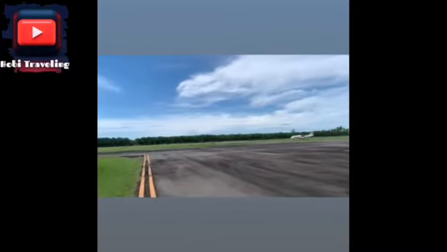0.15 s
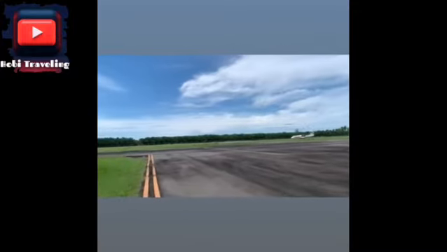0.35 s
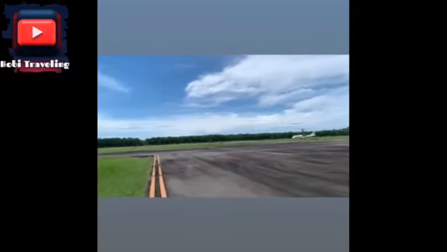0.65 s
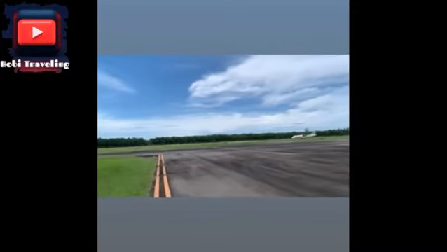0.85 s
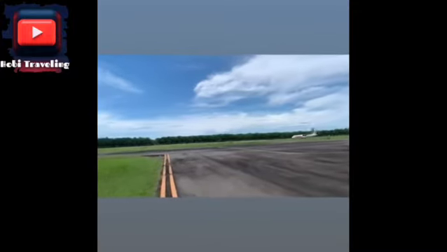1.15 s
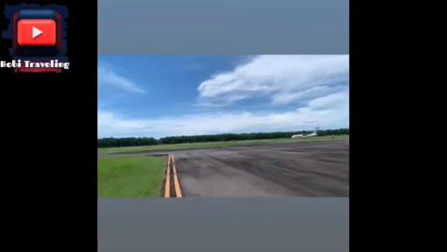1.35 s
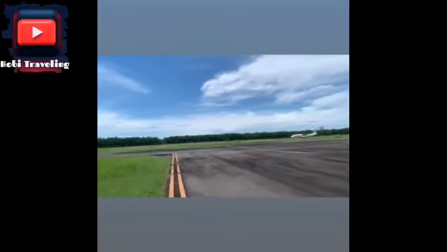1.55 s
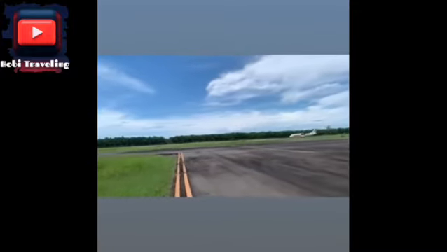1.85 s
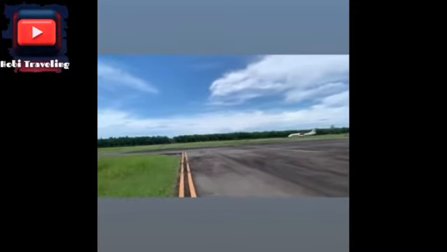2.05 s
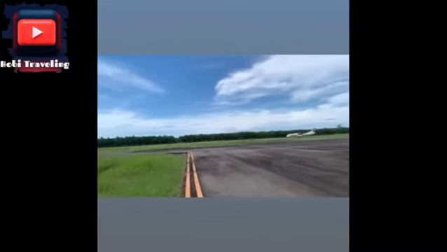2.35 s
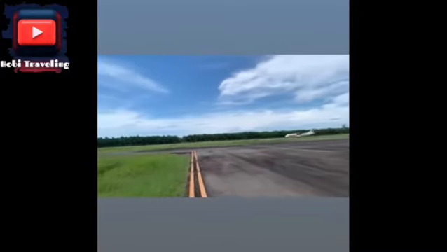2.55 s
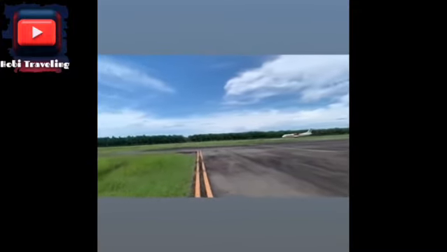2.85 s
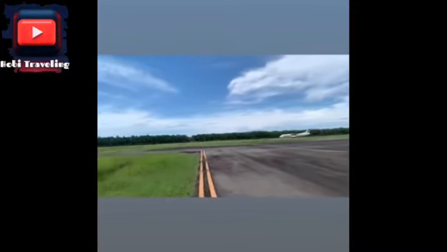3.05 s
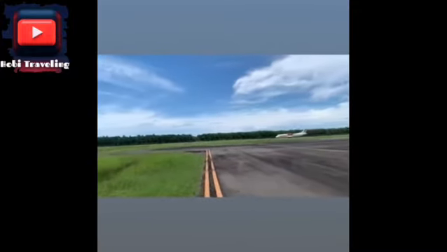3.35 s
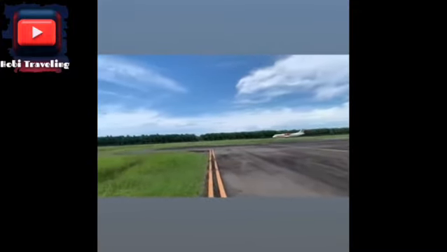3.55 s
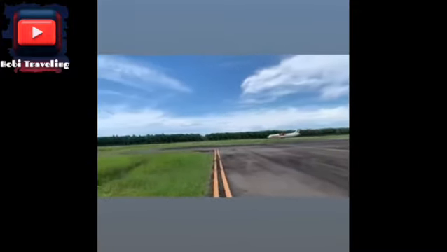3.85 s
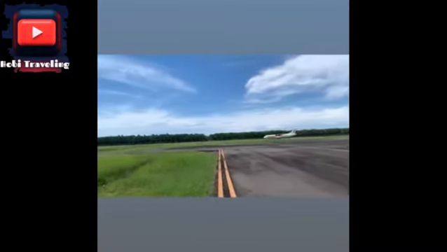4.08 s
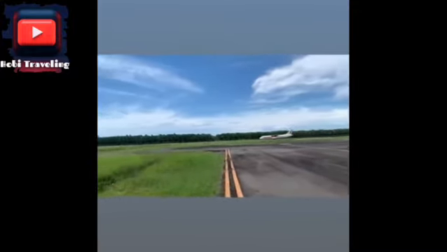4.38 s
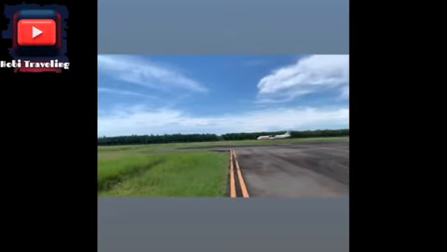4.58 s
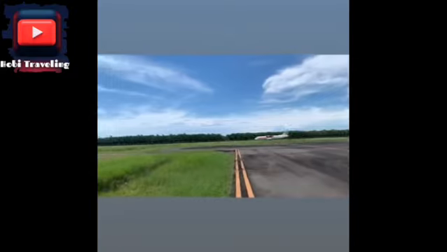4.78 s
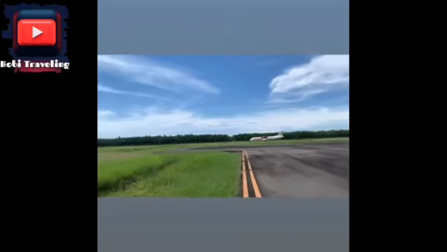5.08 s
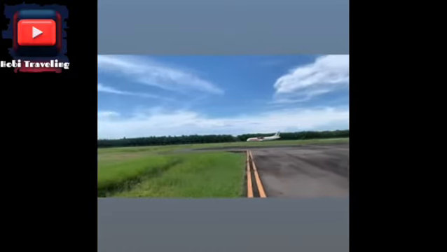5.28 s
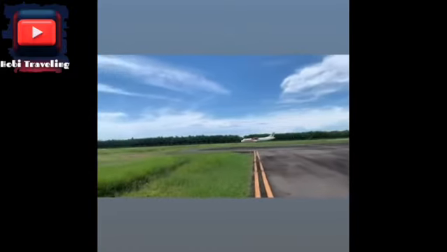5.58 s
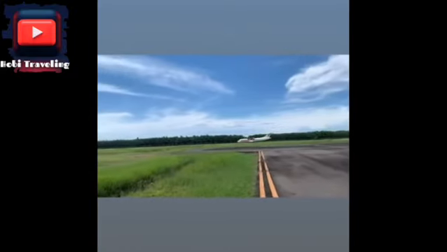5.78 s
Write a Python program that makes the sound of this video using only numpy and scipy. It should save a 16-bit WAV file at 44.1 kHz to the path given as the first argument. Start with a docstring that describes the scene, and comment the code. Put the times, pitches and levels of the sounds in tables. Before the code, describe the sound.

A twin-engine turboprop plane rolls along a distant runway on an open airfield. Its low propeller hum swells and dips slowly over an exhaust rumble and a rush of air. From about halfway the drone grows louder and fuller, sinking slightly in pitch, while high turbine hiss arrives in gusts. Near the end a light wind thumps faintly on the hand-held stereo microphone.

```python
"""The propellers of a twin turboprop hum at the blade-passing rate, beating slowly, as it rolls nearer
along a distant runway. Under them the exhaust rumbles; the propeller wash and slipstream roar, and
turbine hiss arrives in gusts through turbulent air, chopped by the passing blades.
A light wind thumps on the ports of a hand-held stereo microphone."""
import sys
import numpy as np
from scipy import signal
from scipy.fft import rfft, irfft, next_fast_len
from scipy.io import wavfile
from scipy.ndimage import map_coordinates

SR = 44100
rng = np.random.default_rng(int(sys.argv[2]) if len(sys.argv) > 2 else 0)


def int16_out(signal):
    """Quantize to a 16-bit WAV file."""
    q = np.round(np.clip(np.atleast_2d(signal).T, -1, 1) * 32767)
    wavfile.write(sys.argv[1], SR, q.astype(np.int16))


N = 261072

# turbine hiss, carried in gusts that also sway the slipstream: t/s, level/dB
GUSTS = [(0, -48.5), (.3, -51), (.88, -42), (1.12, -49), (1.4, -43), (1.58, -44), (1.66, -49),
         (1.85, -46.5), (2.08, -42.5), (2.25, -36), (2.4, -36.5), (2.5, -33.5), (2.65, -45), (2.95, -40.5),
         (3.05, -37), (3.11, -33), (3.18, -35.5), (3.26, -40), (3.4, -44), (3.53, -40.5), (3.72, -41.5),
         (3.87, -43), (4.14, -35), (4.19, -31), (4.33, -31), (4.42, -37), (4.56, -36), (4.71, -35),
         (4.83, -38), (5.13, -41), (5.21, -40.5), (5.27, -33), (5.31, -34), (5.38, -36.5), (5.44, -33.5),
         (5.51, -33.5), (5.6, -36.5), (5.7, -37), (5.81, -37), (5.86, -37.5), (5.92, -40)]


def propellers(blade_phase):
    """Superposition: blade harmonics add up to pulses; the air path makes each waver, less when near."""
    # fundamental, swelling and dipping as the two propellers beat: t/s, level/dB
    hum = [(0.0, -44), (0.18, -35), (0.46, -40.5), (0.63, -30.5), (1.09, -35.5), (1.17, -30), (1.35, -45),
           (1.43, -31), (1.76, -35.5), (1.83, -46.5), (2.01, -30.5), (2.29, -35.5), (2.32, -48),
           (2.39, -29.5), (2.6, -30.5), (2.77, -37), (2.83, -28.5), (3.08, -32.5), (3.12, -25), (3.31, -32),
           (3.38, -26), (3.79, -24.5), (3.89, -25.5), (4.29, -19.5), (4.42, -21), (4.47, -18.5),
           (4.71, -23), (4.81, -19.5), (5.08, -27.5), (5.13, -22), (5.23, -25.5), (5.46, -20),
           (5.56, -28.5), (5.8, -28), (5.85, -23), (5.92, -28)]
    # second harmonic, emerging on the approach: t/s, level/dB
    overtone = [(2.9, -52.5), (3.1, -45), (3.2, -41), (3.37, -31.5), (3.45, -41), (3.52, -38),
                (3.63, -37.5), (3.8, -28.5), (4, -34), (4.2, -42.5), (4.38, -28.5), (4.55, -38),
                (4.71, -38.5), (4.8, -29), (5.08, -29.5), (5.47, -36), (5.55, -52), (5.77, -42.5),
                (5.83, -36), (5.92, -30.5)]
    t = np.arange(N) / SR
    emerged = np.clip((t - overtone[0][0]) / .27 + 1, 0, 1)
    unrest = 1 - .85 * np.clip(t - 2.4, 0, 1)
    third_db = -55.5 + 4 * drift(2.25) - 4 * np.maximum(t - 4.4, 0)  # fades as the aircraft turns
    levels = [from_db(in_time(hum)[0]), emerged * from_db(in_time(overtone)[0]),
              emerged * from_db(third_db)]
    tone = 0
    for harmonic, level, waver_db in zip((1, 2, 3), levels, (2.2, 1.1, 1.2)):
        amplitude = np.sqrt(2) * level * from_db(waver_db * unrest * drift(18))
        tone += amplitude * np.cos(harmonic * blade_phase + .35 * unrest * drift(7))
    return tone


def exhaust_and_wash():
    """Turbulent mixing: exhaust and propeller wash radiate bands of noise that grow on the approach."""
    # t/s, then level/dB of deep rumble, exhaust growl, exhaust drone and wash
    approach = [(0, -40, -41, -51.5, -45), (.75, -43, -40, -55, -50.5), (1.2, -43, -39.5, -52, -45.5),
                (1.6, -42, -38, -51, -44.5), (1.9, -39, -37.5, -49, -42.5), (2.5, -41.5, -34.5, -47, -44.5),
                (3, -38.5, -33, -44, -42.5), (3.5, -38.5, -31, -42, -45.5), (4, -39, -31, -38.5, -42),
                (4.3, -33, -29.5, -38.5, -42), (4.7, -35, -30.5, -43.5, -39), (5, -30.5, -26.5, -42, -42.5),
                (5.15, -36, -28, -53, -46.5), (5.24, -30, -27.5, -51, -39.5),
                (5.35, -30.5, -35.5, -46, -41), (5.5, -35, -27, -48.5, -36.5), (5.58, -25, -27, -41.5, -39),
                (5.7, -27, -36.5, -43, -37), (5.8, -32, -31, -47, -39), (5.92, -41, -29, -54, -43)]
    # their four spectra: f/Hz, level/dB
    rumble = [(15, -38), (25, -33), (35, -23), (50, -5.5), (80, 0), (110, 2), (140, -25), (250, -58.5)]
    growl = [(80, -59), (110, -6.5), (130, 0), (150, 2), (180, -4.5), (215, -7), (250, -9.5), (330, -48)]
    drone = [(180, -30), (260, -2.5), (330, -2), (420, -10.5), (520, -18), (700, -49)]
    wash = [(400, -18), (560, -18), (680, 0), (800, 3), (1100, 1), (1500, -2.5), (2200, -12.5)]
    rumble_db, growl_db, drone_db, wash_db = in_time(approach)
    return (from_db(rumble_db) * turbulent_noise(rumble, flicker_db=-1, rate=18)
            + from_db(growl_db) * turbulent_noise(growl, flicker_db=1.37, rate=4.3)
            + from_db(drone_db) * turbulent_noise(drone, flicker_db=.5, rate=5.1)
            + from_db(wash_db) * turbulent_noise(wash, flicker_db=1, rate=12.6))


def slipstream():
    """Flow noise: a roar and a brighter rush, each following a share of the gusts' swing."""
    # at a middling gust: t/s, roar level/dB, rush level/dB
    levels = [(0, -41, -38.5), (.6, -40.5, -40.5), (1, -40, -43), (1.5, -38.5, -47.5), (2.2, -37.5, -43.5),
              (2.6, -40.5, -47.5), (3.1, -38.5, -44.5), (3.75, -41, -47.5), (4.05, -33.5, -37),
              (4.2, -35, -36), (4.3, -34.5, -33.5), (4.4, -36, -41), (4.56, -35.5, -38.5),
              (4.62, -37, -43.5), (4.72, -38, -39), (4.85, -36.5, -39), (5.15, -38, -35),
              (5.28, -37, -40.5), (5.33, -33, -32), (5.4, -34, -38), (5.92, -37, -36.5)]
    # their spectra: f/Hz, level/dB
    roar = [(700, -25), (1200, -3), (1700, 0), (2100, -1), (2300, -6), (2550, 1), (2800, 1), (3000, -14),
            (4200, -30)]
    rush = [(2000, -25), (2700, 8), (3050, -2.5), (3450, 13), (3800, 4.5), (4200, 10.5), (4600, -4.5),
            (5500, -35), (7000, -26), (9000, -39)]
    roar_db, rush_db = in_time(levels)
    swing_db = in_time(GUSTS)[0] + 38  # zero at a middling gust
    return (from_db(roar_db + .38 * swing_db) * turbulent_noise(roar, flicker_db=.7, rate=18)
            + from_db(rush_db + .58 * swing_db) * turbulent_noise(rush, flicker_db=.7, rate=18))


def low_wash():
    """Flow noise: the lower end of the propeller wash, weak while far, wavers as one band."""
    # f/Hz, level/dB
    spectrum = [(220, -73), (300, -23), (420, -5), (520, -4.5), (620, -3), (800, -9), (1000, -74)]
    # t/s, level/dB
    level = [(0, -57.5), (.9, -56), (1.6, -51), (2.7, -48.5), (3.5, -47), (4.4, -52), (5.2, -43),
             (5.92, -44)]
    noise = colour(rng.standard_normal((3, N)), lambda hz: from_db(at_hz(spectrum, hz)))
    return from_db(in_time(level)[0] + 2 * drift(7.4)) * rms_one(noise)


def turbines(blade_phase, whistle_hz=8350, width_hz=860):
    """Amplitude modulation: broad hiss and a noisy inlet whistle swell once per passing blade."""
    # hiss: f/Hz, level/dB
    spectrum = [(4200, -47), (5200, -36), (5800, -12), (6300, -1), (7000, 0.5), (8200, -7), (9200, -4),
                (10000, -9), (10400, -22), (10800, -23), (12000, -61)]
    # whistle, flaring in gusts and growing as the intakes near: t/s, level/dB
    flares = [(0.0, -66), (0.92, -51), (1.15, -69), (1.24, -51.5), (1.58, -52), (1.63, -56), (2.11, -50),
              (2.28, -41), (2.39, -43), (2.47, -41), (2.69, -51), (3.03, -46), (3.1, -33), (3.26, -48),
              (3.33, -36.5), (3.4, -53), (3.56, -39), (3.61, -61), (3.66, -43), (3.87, -46.5), (4.2, -33.5),
              (4.32, -33), (4.42, -37.5), (4.76, -32), (4.81, -41), (4.95, -34), (4.98, -38), (5.09, -35),
              (5.14, -38), (5.21, -28.5), (5.28, -35), (5.31, -23.5), (5.34, -33.5), (5.44, -32.5),
              (5.51, -22), (5.64, -31), (5.82, -25.5), (5.85, -39), (5.89, -32), (5.92, -37)]
    # blade chop: t/s, depth (0-1)
    depth = [(0, 0.07), (2, 0.03), (3.7, 0.14), (4.1, 0.15), (5, 0.25), (5.4, 0), (5.52, 0.3), (5.65, 0.23),
             (5.92, 0.4)]
    band = colour(rng.standard_normal((3, N)), lambda hz: np.exp(-((hz - whistle_hz) / width_hz) ** 2))
    hiss = from_db(in_time(GUSTS)[0]) * turbulent_noise(spectrum, flicker_db=.9, rate=22)
    whistle = from_db(in_time(flares)[0] + 1.8 * drift(40)) * rms_one(band)
    return (1 + in_time(depth)[0] * np.sin(blade_phase)) * (hiss + whistle)


def low_hiss():
    """Flow noise: the lower edge of the turbine hiss, less shaken by the gusts."""
    # f/Hz, level/dB
    spectrum = [(3700, -32), (4200, -7.5), (4700, 3.5), (5200, -1.5), (5700, -2), (6200, -14), (7000, -40)]
    # t/s, level/dB
    level = [(0.0, -51.5), (0.2, -54), (0.81, -45.5), (0.87, -50), (1.76, -49.5), (2.44, -40.5),
             (2.67, -50.5), (3.12, -41), (3.31, -48), (3.87, -48.5), (4.29, -34.5), (4.44, -46),
             (4.73, -40), (4.8, -45.5), (5.41, -43), (5.47, -60), (5.49, -37.5), (5.64, -46), (5.8, -41.5),
             (5.92, -43)]
    return from_db(in_time(level)[0]) * turbulent_noise(spectrum, flicker_db=.7, rate=20)


def wind():
    """Pseudo-sound: the wind's pressure fluctuations thump on the microphone ports."""
    # f/Hz, level/dB
    spectrum = [(12, -12), (20, -12), (30, 1), (45, -3), (70, -10), (120, -38)]
    # t/s, level/dB
    level = [(0.0, -62), (0.46, -61), (4.06, -59), (4.25, -45), (4.34, -66), (4.39, -52.5), (4.83, -59),
             (4.96, -50), (5.13, -68), (5.21, -60), (5.54, -53), (5.57, -40), (5.82, -47), (5.92, -60)]
    return from_db(in_time(level)[0]) * turbulent_noise(spectrum, flicker_db=3, rate=5)


def capsules(tone, noise):
    """Direct and diffuse field: direct sound reaches the left late; scattered sound differs by side."""
    # the handset's shadow: f/Hz, left minus right level/dB, further left phase lag/rad
    shade = [(30, -.5, .1), (150, -1.1, .25), (450, -1, .15), (680, -5, .25), (1300, -2.2, .15),
             (2400, -2, -.4), (2950, -.5, .4), (4000, -2.5, -.6), (4650, -5, 0), (5400, -2.5, -.6),
             (6100, -7, -.3), (7300, 1.4, -.4), (8500, -.6, -.6)]
    # diffuse sound: f/Hz, share of power (0-1)
    scatter = [(25, .2), (80, .07), (300, .1), (550, .3), (1500, .3), (2950, .12), (4500, .45), (5400, .15),
               (6200, .55), (8000, .5)]
    # the bearing swings towards the front: t/s, left lag/microseconds
    lag = [(0, 125), (1.2, 145), (3.5, 140), (4.0, 108), (4.9, 98), (5.2, 88), (5.92, 80)]
    direct = tone + colour(noise[0], lambda hz: np.sqrt(1 - at_hz(scatter, hz)))
    scattered = colour(noise[1:], lambda hz: np.sqrt(at_hz(scatter, hz)))
    late = np.arange(N) - in_time(lag)[0] * 1e-6 * SR
    left = map_coordinates(direct, [late], order=5, mode="nearest") + scattered[0]
    right = direct + scattered[1]
    half_shade = lambda hz: from_db(at_hz(shade, hz) / 2) * np.exp(-.5j * at_hz(shade, hz, column=2))
    return np.array([colour(left, half_shade), colour(right, lambda hz: 1 / half_shade(hz))])


def turbulent_noise(spectrum, flicker_db, rate):
    """Scintillation: half-octave bands flicker partly in step. Rows: direct, scattered left and right."""
    source = colour(rng.standard_normal((3, N)), lambda hz: from_db(at_hz(spectrum, hz)))
    total, together = 0, drift(rate)
    octaves = np.log2(spectrum[-1][0] / spectrum[0][0])
    for centre in spectrum[0][0] * 2 ** np.arange(0, octaves + .5, .5):
        band = colour(source, lambda hz: np.cos(np.pi * np.clip(np.log2(hz / centre), -.5, .5)) ** 2)
        total += band * from_db(flicker_db * (1.1 * together + drift(rate)))
    return rms_one(total)


def drift(rate):
    """Random fluctuation of rms 1: coarse noise through two one-pole low-passes at rate/Hz."""
    pole = np.exp(-80 * np.pi * rate / SR)
    slow = signal.lfilter([1], [1, -2 * pole, pole * pole], rng.standard_normal(N // 40 + 2002))[2000:]
    return np.interp(np.arange(N) / 40, np.arange(len(slow)), rms_one(slow))


def colour(x, gain_at):
    """Fourier filtering by a gain given as a function of frequency."""
    size = next_fast_len(N + 2048)
    hz = np.maximum(np.arange(size // 2 + 1) * SR / size, 1)
    return irfft(rfft(x, size) * gain_at(hz), size)[..., :N]


def in_time(rows):
    """Linear interpolation of a table's columns at every sample."""
    t, *columns = np.transpose(rows)
    return [np.interp(np.arange(N) / SR, t, column) for column in columns]


def at_hz(points, hz, column=1):
    """Interpolation of a spectrum on a log-frequency axis."""
    points = np.array(points)
    return np.interp(np.log(hz), np.log(points[:, 0]), points[:, column])


def from_db(db):
    """Level to amplitude ratio."""
    return 10 ** (np.asarray(db) / 20)


def rms_one(x):
    """Normalisation to rms 1."""
    return x / np.sqrt(np.mean(x ** 2) + 1e-20)


def scene():
    """Superposition of all sources at the two capsules."""
    # blade-passing rate, sinking as the approach turns sideways: t/s, f/Hz
    blade_rate = [(0, 123.8), (1.3, 124.2), (2.0, 124.6), (2.9, 124.1), (3.5, 123.8), (4.2, 123.0),
                  (4.6, 122.4), (5, 121.8), (5.4, 121.2), (5.92, 120.6)]
    blade_phase = 2 * np.pi * np.cumsum(in_time(blade_rate)[0]) / SR
    noise = exhaust_and_wash() + slipstream() + low_wash() + low_hiss() + wind() + turbines(blade_phase)
    return capsules(propellers(blade_phase), noise)


def record(dry):
    """Band limiting: the highest treble is the same in both channels, and the top is cut."""
    mono_above_hz, stop_hz = 8900, 11300
    mid = (dry[0] + dry[1]) / 2
    side = (dry[0] - dry[1]) / 2
    side = signal.sosfiltfilt(signal.cheby2(12, 40, mono_above_hz, fs=SR, output="sos"), side)
    return signal.sosfilt(signal.cheby2(18, 70, stop_hz, fs=SR, output="sos"), [mid + side, mid - side])


dry = scene()
out = record(dry)
int16_out(out)
```